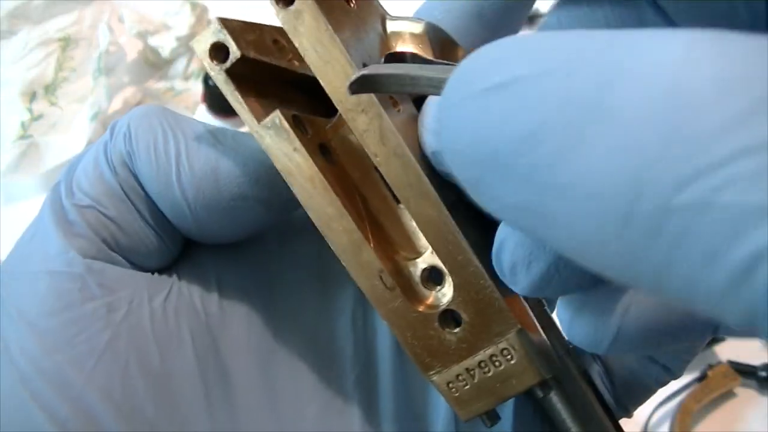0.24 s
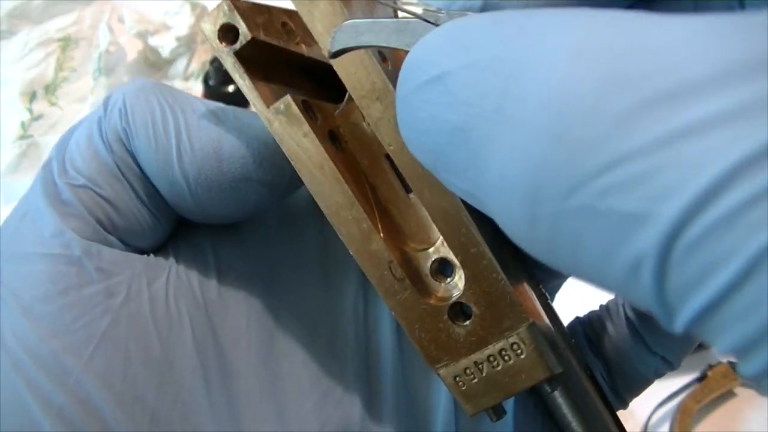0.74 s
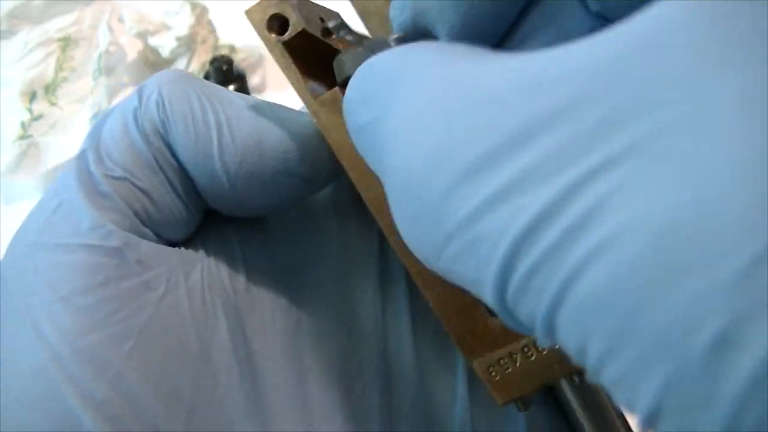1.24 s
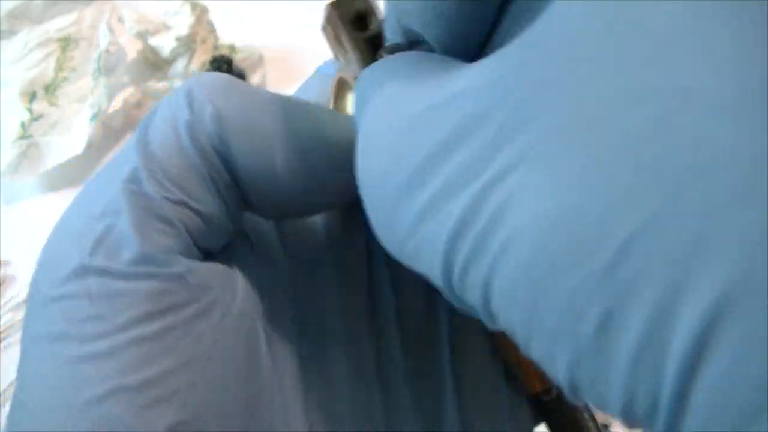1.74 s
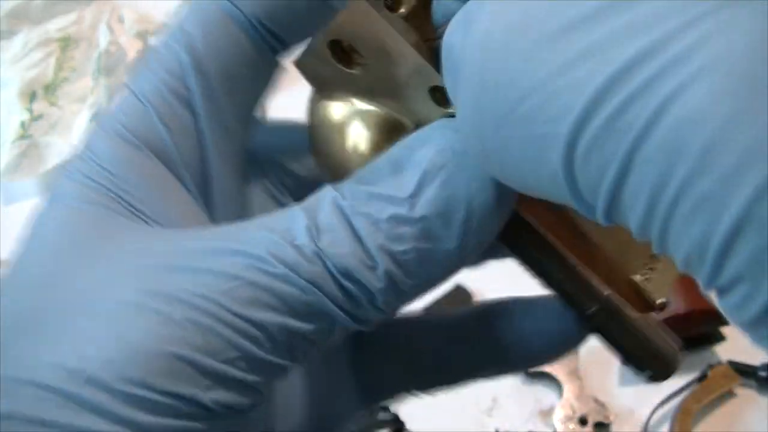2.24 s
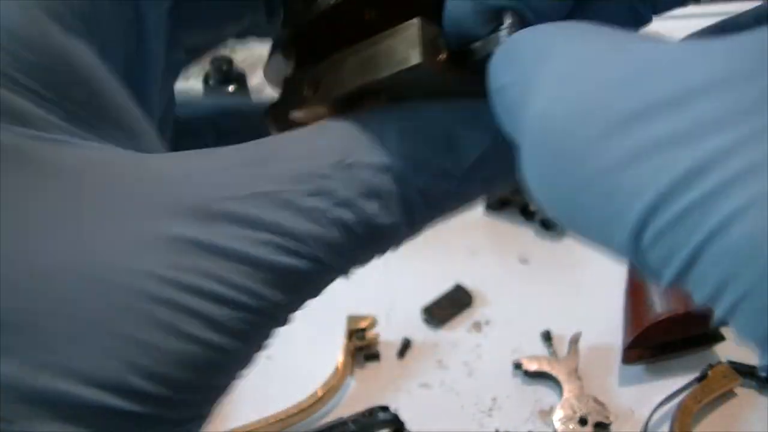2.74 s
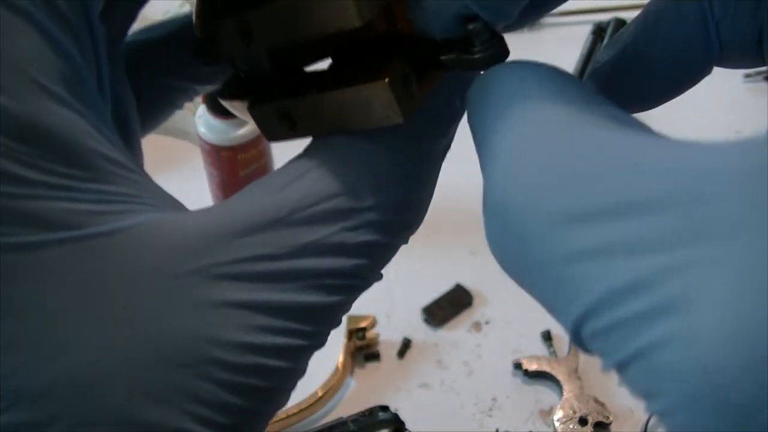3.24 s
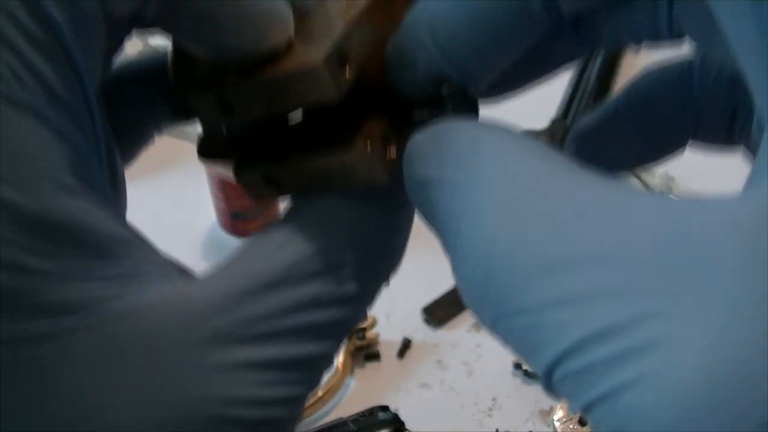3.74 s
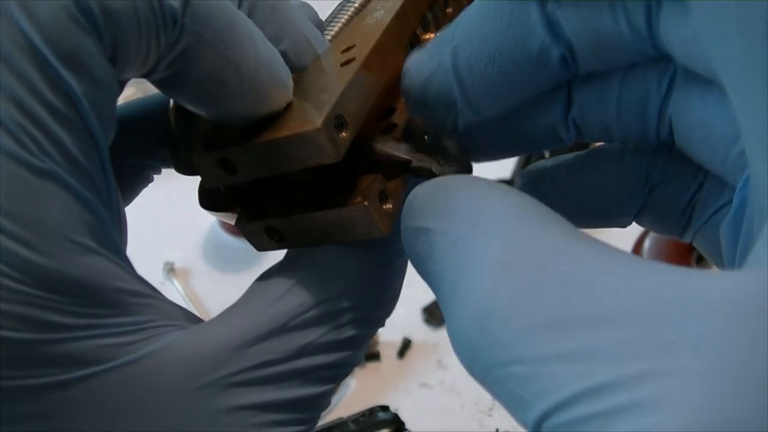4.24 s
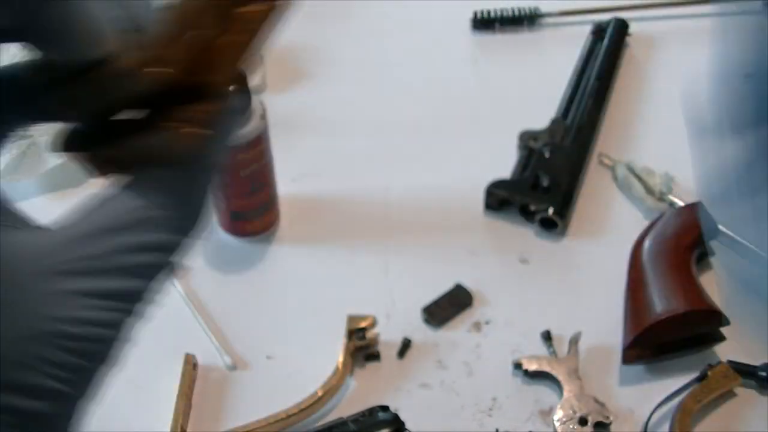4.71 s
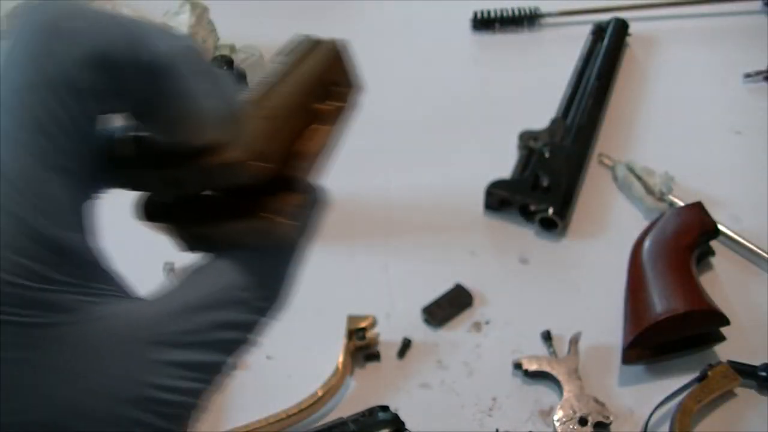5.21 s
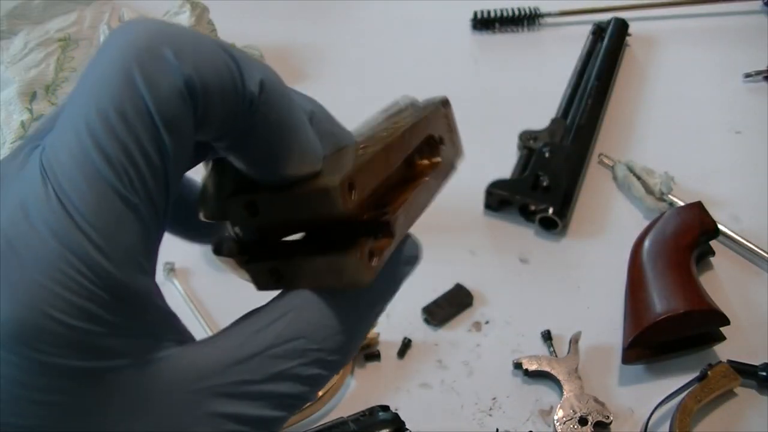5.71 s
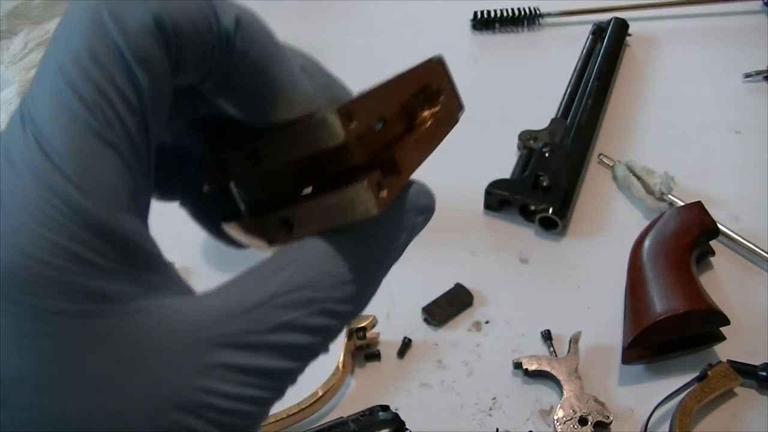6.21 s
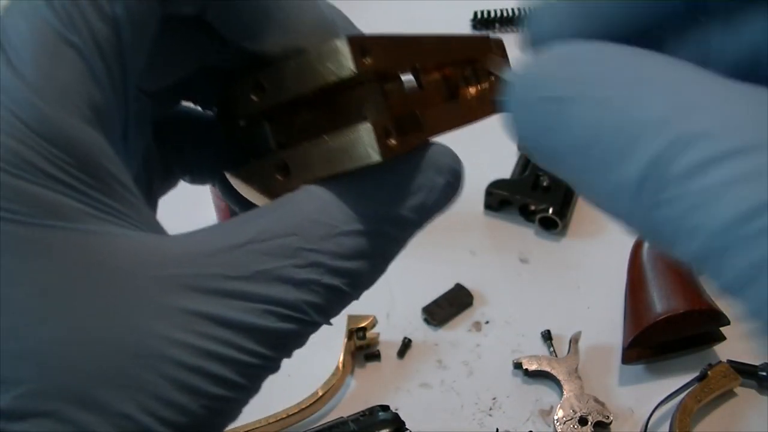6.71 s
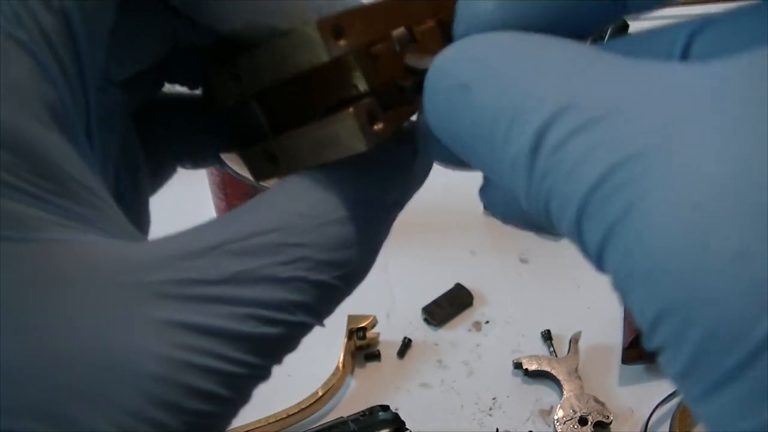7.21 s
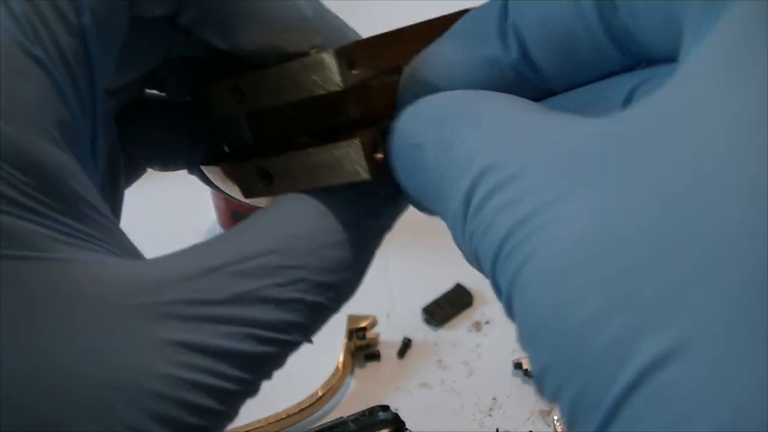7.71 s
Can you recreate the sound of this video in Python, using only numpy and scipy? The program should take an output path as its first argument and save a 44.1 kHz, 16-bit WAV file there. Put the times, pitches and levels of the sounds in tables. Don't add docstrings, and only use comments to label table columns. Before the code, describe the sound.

Very close in a small room with a low, wavering appliance hum, rubber gloves rub and squeak while small metal parts tick against a brass frame. A busy cluster of clicks peaks with one hard snap, then sparse ticks. Midway a part drops, cracks and bounces on the table, skids, and a wrist thumps softly. Glove rustle and light lever scrapes follow.

```python
import sys
import numpy as np
from scipy import signal
from scipy.fft import rfft, irfft
from scipy.io import wavfile
from scipy.ndimage import uniform_filter1d

SR = 44100
rng = np.random.default_rng(int(sys.argv[2]) if len(sys.argv) > 2 else 0)


def nominal_scale(level):
    x = np.asarray(level, float) / 20
    return 10 ** x


def generate_wav(signal):
    frames = np.transpose(np.atleast_2d(signal))
    scaled = np.clip(frames, -1, 1) * 32767
    pcm = np.round(scaled).astype(np.int16)
    wavfile.write(sys.argv[1], SR, pcm)


N = 351036
DECAY = np.log(1000)
ONSET_S = 0.0008


def level(x, db):
    return x * nominal_scale(db) / np.sqrt(np.mean(x ** 2))


def band(x, lo_hz, hi_hz):
    sos = signal.butter(2, [lo_hz, min(hi_hz, 0.45 * SR)], "band", fs=SR, output="sos")
    return signal.sosfilt(sos, x)


def walk(rate_hz):
    hold = int(SR / rate_hz)
    steps = np.repeat(rng.standard_normal(N // hold + 1), hold)
    return 1.729 * uniform_filter1d(uniform_filter1d(steps, hold), hold)[:N]


def ring(hz, t60_s, length_s):
    t = np.arange(int(length_s * SR)) / SR
    return np.sin(2 * np.pi * hz * t) * np.exp(-DECAY * t / max(t60_s, 0.001))


def add(out, start_s, x):
    i = int((start_s + ONSET_S) * SR)
    out[i:i + len(x)] += x[:N - i]


def strokes(rows, lean):
    fade_db = 15
    t, power = np.arange(0, N + 64, 64) / SR, 0
    for peak_s, rise_s, fall_s, db, colour_db in rows:
        away = np.where(t < peak_s, (peak_s - t) / rise_s, (t - peak_s) / fall_s)
        power = power + nominal_scale(db + lean * colour_db - fade_db * away) ** 2
    return np.interp(np.arange(N) / SR, t, np.sqrt(power))


# pitch_hz [Hz], level_db [dB]
MOTOR_TONES = [(118.4, -67), (220.7, -61.5), (296.1, -62), (344.5, -56.5), (382.2, -62.5), (430.7, -62),
               (532.9, -75.5)]
# freq_hz [Hz], density_db [dB per Hz]
AIR_COLOUR = [(24, -57), (40, -10.5), (91, -14), (106, -10.5), (180, -9), (209, -0.5), (262, -5),
              (345, -4.5), (556, -14.5), (1270, -23.5), (1370, -23), (1760, -24), (4340, -31), (10400, -36),
              (16000, -42.5)]
# freq_hz [Hz], likeness [0-1]
PORT_LIKENESS = [(60, 0.12), (130, 0.3), (290, 0.77), (640, 0.03), (1410, 0), (3100, 0), (6820, 0),
                 (15000, 0)]


def hum():
    t = np.arange(N) / SR
    tones = 0
    for pitch_hz, db in MOTOR_TONES:
        swell = nominal_scale(db + 3.0 + 1.687 * walk(9))
        tones = tones + swell * np.sin(2 * np.pi * pitch_hz * t + 0.783 * walk(4))
    log_hz = np.log(np.maximum(np.fft.rfftfreq(N, 1 / SR), 1))
    air_hz, air_db = np.transpose(AIR_COLOUR)
    like_hz, likeness = np.transpose(PORT_LIKENESS)
    colour = nominal_scale(np.interp(log_hz, np.log(air_hz), air_db))
    like = np.clip(np.interp(log_hz, np.log(like_hz), likeness), 0, 1) ** 0.5
    mid = irfft(rfft(rng.standard_normal(N)) * colour, N)
    side = irfft(rfft(rng.standard_normal(N)) * colour * np.sqrt((1 - like) / (1 + like)), N)
    air = level(np.array([mid + side, mid - side]), -50) * nominal_scale(0.5 * walk(2.862))
    return (air + tones) * nominal_scale(np.array([[0.4], [-0.4]]))


# peak_s [s], rise_s [s], fall_s [s], level_db [dB],
# brightness_db [dB]
GLOVE_RUBS = [(.085, 0.16, 0.052, -61, -1.5), (.16, 0.039, 0.065, -67.5, 7),
              (.474, .03, 0.107, -77.5, -9), (1.427, 0.047, 0.18, -63, -3.5),
              (1.731, 0.08, 0.079, -55.5, 1), (1.891, 0.157, 0.264, -48.5, 0.5),
              (2.085, 0.158, 0.078, -46.5, -0.5), (2.187, 0.0137, 0.035, -43, 2),
              (2.217, 0.0136, 0.0426, -40, 7.5), (2.258, 0.048, 0.0256, -45, -2),
              (2.41, 0.158, 0.205, -47.5, 1.2), (2.502, 0.016, 0.0295, -59, 11),
              (2.574, 0.101, 0.276, -52, 0), (2.898, 0.055, 0.408, -55, 1),
              (3.417, 0.032, 0.105, -60.5, -3.5), (3.602, 0.047, 0.053, -60.5, 0),
              (4.171, .035, 0.052, -69.5, 10), (4.28, 0.032, 0.0225, -66, 16.5),
              (4.825, 0.0186, 0.0805, -40, -2.5), (4.884, 0.039, 0.096, -50, -8.5),
               (4.925, 0.079, 0.0153, -53, 4), (5.05, 0.118, 0.234, -68.5, -17.5),
               (5.444, 0.0176, 0.046, -43.5, -3), (5.5, 0.061, 0.0142, -40.5, 4),
               (5.55, 0.176, 0.283, -51, 1), (5.795, 0.0236, 0.08, -44, 3.5),
               (5.832, 0.062, 0.0625, -42.5, 2.5), (5.948, 0.0068, 0.057, -44.5, 6.5),
               (5.983, 0.033, 0.087, -46, -2), (6.133, 0.0236, 0.0363, -47, 2.5),
               (6.432, 0.089, 0.039, -56, -1.5), (6.5, 0.085, 0.047, -64.5, 6.5),
               (6.67, 0.196, 0.66, -70, 10), (7.129, 0.089, 0.258, -56.5, -2.5),
               (7.378, 0.075, 0.044, -57, 1), (7.555, 0.064, 0.1, -58.5, -4),
               (7.61, 0.014, 0.148, -54.5, 5), (7.912, 0.2, .04, -63.5, -4.5)]
# low_hz [Hz], high_hz [Hz], level_db [dB], brightness_share [ratio]
RUBBER_BANDS = [(545, 2060, -6, -0.987), (2538, 4780, -2.5, -0.49), (4306, 7660, -4, 0.64),
                (7680, 11200, -5.5, 0.526), (11100, 14330, -14.5, 1.13)]


def gloves():
    snap_gain, snaps_per_s, resting_db = 2, 600, -73
    snaps = rng.random(N) < snaps_per_s / SR
    slips = nominal_scale(1.18 * walk(150)) * (1 + snap_gain * snaps)
    out = 0
    for low_hz, high_hz, db, lean in RUBBER_BANDS:
        grains = rng.standard_normal(N) * nominal_scale(1.73 * rng.exponential(size=N))
        grains = grains * slips * nominal_scale(2.0 * walk(60))
        pressure = strokes(GLOVE_RUBS, lean) + nominal_scale(resting_db)
        out = out + pressure * level(band(grains, low_hz, high_hz), db)
    return out


# pitch_hz [Hz], level_db [dB], t60_s [s]
FRAME_MODES = [(2374, -2, 0.0256), (3540, -5, 0.0227), (5190, -5, 0.017)]
# start_s [s], level_db [dB peak]
FRAME_TOUCHES = [(0.312, -31), (0.479, -38), (1.163, -36.5), (2.7576, -37.5), (3.561, -41), (3.9325, -33),
                 (5.1006, -39), (6.4849, -33), (6.5111, -42.5), (7.0189, -36.5)]
# start_s [s], level_db [dB
# peak], pitch_hz [Hz]
DULL_CONTACTS = [(0.064, -42, 2080), (0.0802, -36, 3500), (0.0987, -39, 3510), (0.127, -45.5, 2700),
                 (0.145, -30, 3350), (0.165, -31, 2940), (0.427, -45, 3000), (0.4689, -26, 2460),
                 (0.623, -40.5, 2700), (1.0735, -41.5, 1820), (1.3066, -43, 1400), (1.417, -38, 2400),
                 (1.4913, -40.5, 2580), (1.533, -43, 2000), (1.557, -39.5, 3060), (1.87, -38.5, 1890),
                 (1.971, -38, 2100), (2.117, -37.5, 2100), (2.137, -30.5, 2900), (2.185, -31.5, 6500),
                 (2.2002, -38.5, 2800), (2.2149, -30.5, 6800), (2.228, -33, 5100), (2.238, -20.5, 6500),
                 (2.253, -31, 3170), (2.262, -32, 3900), (2.3483, -26.5, 3530), (2.3575, -27, 3300),
                 (2.369, -28.5, 3304), (2.378, -39, 2200), (2.441, -34.5, 2390), (2.615, -38.5, 2610),
                 (2.648, -43.5, 3000), (2.6808, -44, 3500), (2.884, -42.5, 2000), (2.9056, -39.5, 2200),
                 (2.93, -41, 2300), (2.968, -39, 4300), (3.053, -32.5, 2470), (3.185, -41.5, 3000),
                 (3.2237, -39, 2500), (3.3598, -39.5, 2300), (3.3895, -38.5, 3100), (3.494, -39, 2900),
                 (3.63, -46.5, 2770), (4.405, -39, 2200), (4.8046, -8, 2215), (5.3576, -35.5, 3090),
                 (5.679, -42.5, 3000), (5.876, -39.5, 2800), (6.443, -37.5, 1970), (6.8409, -47.5, 2500),
                 (7.194, -42, 2200), (7.2275, -45, 2994), (7.468, -43, 2300), (7.566, -38.5, 3300),
                 (7.5907, -34.5, 3400), (7.7708, -43.5, 2400)]
# start_s [s], level_db [dB peak], pitch_hz [Hz], edge_db [dB]
SHARP_CONTACTS = [(1.0736, -30.5, 4660, -13.5), (1.4137, -41.5, 3900, -9.5), (1.428, -33.5, 4100, 1.5),
                  (1.689, -35.5, 5500, -1.5), (1.8373, -38, 1700, 1), (1.864, -31.5, 11000, 0.5),
                  (1.979, -32.5, 9800, -8), (2.015, -38.5, 3550, -6), (2.033, -34, 9600, -1.5),
                  (2.109, -33, 10600, -9), (2.2352, -6, 6290, -5.5), (2.236, -17.5, 7870, -21),
                  (2.3105, -39.5, 3080, -1.5), (2.327, -29.5, 4400, 3.5), (2.4798, -38, 2300, 1),
                  (2.5657, -27, 3170, -3.5), (2.569, -28, 5200, -3), (2.8774, -46.5, 9000, 0),
                  (2.9053, -40.5, 8100, -8), (3.0184, -36, 2110, -2), (3.043, -40, 10500, -7.5),
                  (3.073, -42.5, 2000, 3), (3.1015, -44, 2050, 10), (3.126, -41, 3200, -1),
                  (3.225, -36.5, 7160, -6.5), (4.284, -45.5, 4330, 14.5), (4.4715, -21.5, 8600, 0.5),
                  (4.485, -19.5, 6800, 0), (4.6564, -27, 9500, -1), (4.779, -25, 6000, -5),
                  (4.8044, -17, 3540, -21.5), (4.8046, -20, 11650, -5), (4.8113, -12, 8160, -17.5),
                  (4.8374, -23.5, 5500, -9.5), (4.86, -23, 8800, -6), (4.8875, -31.5, 5200, -7),
                  (4.8943, -34.5, 8700, -14), (4.914, -39, 8460, -6), (5.384, -40.5, 5057, -3),
                  (5.4387, -28.5, 1497, -1), (5.439, -23.5, 3700, -7), (5.546, -39, 4000, 4),
                  (5.5861, -42.5, 4500, -1.5), (5.722, -40, 9000, -6), (5.798, -39, 9500, -6.5),
                  (5.976, -21.5, 4070, -0.1), (6.0036, -34, 4400, 1.5), (6.1257, -29, 5670, 1),
                  (6.9931, -47, 7440, -2), (7.119, -44, 5500, -1)]
# start_s [s], level_db [dB peak], pitch_hz [Hz], thud_db [dB]
HEAVY_CONTACTS = [(0.145, -28.5, 1760, -5.5), (1.9835, -37.5, 1520, 1), (2.19, -28, 6480, -4.5),
                  (2.2245, -36.5, 1740, -4.5), (2.235, -30, 1806, -11.5), (2.4404, -21.5, 5300, -2.5),
                  (2.466, -40, 1300, -3.5), (4.725, -30, 1336, 5.5), (4.8523, -31, 2200, -5),
                  (4.8604, -28, 1900, -2), (4.8775, -31.5, 1360, -4.5), (4.8874, -33, 1950, -6.5),
                  (4.9005, -35.5, 1800, 4), (5.829, -40, 1000, -2), (5.98, -34, 1070, -6.5),
                  (5.99, -41.5, 950, -3)]


def ticks():
    light_thud_db, dull_edge_db, heavy_edge_db = -45, -39.5, -31
    rows = [(s, db, 0, light_thud_db, dull_edge_db) for s, db in FRAME_TOUCHES]
    rows += [(s, db, hz, light_thud_db, dull_edge_db) for s, db, hz in DULL_CONTACTS]
    rows += [(s, db, hz, light_thud_db, edge_db) for s, db, hz, edge_db in SHARP_CONTACTS]
    rows += [(s, db, hz, thud_db, heavy_edge_db) for s, db, hz, thud_db in HEAVY_CONTACTS]
    out, t = np.zeros(N), np.arange(1764) / SR
    impact = t == 0
    thud = ring(967, 0.00297, 0.04)
    for start_s, db, pitch_hz, thud_db, edge_db in rows:
        noise = rng.standard_normal(len(t))
        rattle = 0.421 * noise * np.exp(-DECAY * t / 0.0183)
        spray = band(rattle + 4.12 * impact, 1160, 7360)
        if pitch_hz:
            body = 1.069 * ring(pitch_hz, 13 / pitch_hz, 0.04) + 0.433 * spray
        else:
            frame = 0
            for (hz, mode_db, t60_s), spot in zip(FRAME_MODES, noise):
                frame = frame + nominal_scale(mode_db + 3.75 * spot) * ring(hz * (1 + 0.0126 * spot), t60_s, 0.04)
            body = 0.563 * frame * np.minimum(t / 0.0019, 1) + 0.84 * spray
        edge = band(1.35 * noise * np.exp(-DECAY * t / 0.003) + impact, 7550, 10800)
        edge = edge * min(nominal_scale(0.69 * (db + edge_db + 55)), 1)
        add(out, start_s, nominal_scale(db) * (body + nominal_scale(thud_db + 5) * thud + nominal_scale(edge_db + 6.0) * edge))
    return band(out, 388, 13400)


# pitch_hz [Hz], level_db [dB], ring_share [share of the ring time]
LEVER_MODES = [(4356, 0.18, 1.01), (4420, -14, 4.9), (4670, -10, 0.314), (5123, -19.5, 0.45),
               (3105.5, 5, 1.03), (3510, 2, 1.64), (6572, 0.5, 0.503), (9800, 7, 0.37), (7160, -0.5, 0.43),
               (10600, 2, 0.36)]
LEVER_MODE_GROUPS = [0, 3, 0, 0, 1, 2, 3, 3, 4, 4]
# start_s [s], level_db [dB peak], lowest_db [dB], upper_db [dB]
LOOSE_LEVER_TAPS = [(1.3831, -70, -9, 9.5), (1.429, -39.5, -15, 4), (1.452, -57.5, -25, -0.5),
                    (1.49, -63, -25, -6), (1.53, -64.5, -25.5, -6.5), (1.6403, -64, -5, 6),
                    (1.679, -50, -20.5, -13), (2.072, -52, -21.5, -19.5), (2.0994, -43, -21.5, -19),
                    (2.465, -50, -18.5, -24), (3.405, -50, -10.5, -10), (4.173, -31, -21.5, -33),
                    (4.2235, -53.5, -14.5, -14.5), (4.264, -40, -18, -7.5), (5.952, -44, -19, -25),
                    (7.196, -46, -16.5, -17.5), (7.212, -54.5, -21, -32), (7.607, -39.5, -21.5, -16.5),
                    (7.614, -40, -8, -8.5), (7.6797, -54.5, -18.5, -18), (7.7167, -56, -18.5, -21.5),
                    (7.757, -57, -22.5, -26.5), (7.819, -52, -19, -15), (7.876, -54.5, -16.5, -17.5),
                    (7.9124, -38, -13, -25.5), (7.945, -58, -7, -22)]
# start_s [s], level_db [dB peak], lowest_db [dB], upper_db [dB]
SEATED_LEVER_TAPS = [(1.3825, -65, 10.5, -14.5), (2.0597, -44.5, -15.5, -11), (2.386, -46.5, -11, -17),
                     (2.4, -43, -10, -8), (2.4217, -37.5, -21.5, -16), (2.889, -43, -17, -4.5),
                     (4.148, -40, -25, -25), (4.1704, -37, -14.5, -28.5), (4.2475, -52, -22.5, -14.5),
                     (7.302, -50.5, -10.5, -7), (7.327, -46, -40.5, -21), (7.374, -39, -15.5, -10.5),
                     (7.4175, -49, -15, -11), (7.438, -50.5, -9, -14.5), (7.652, -56, -17.5, -13.5)]
# peak_s [s], rise_s [s], fall_s [s], main_db [dB], high_db [dB]
LEVER_SLIDES = [
    (1.742, 0.095, 0.0253, -45.5, -9),
    (2.068, 0.028, 0.044, -57.5, -19.5),
    (2.405, 0.031, 0.039, -45, -13.5),
    (3.408, 0.0117, 0.0137, -52.5, -17.5),
    (4.176, 0.039, .02, -53, -6),
    (7.45, 0.044, 0.0264, -46, -16),
    (7.615, 0.0174, 0.034, -45.5, -18),
    (7.917, 0.026, 0.038, -48, -19),
]


def lever():
    ring_s = 0.0709
    other_low_db, other_up_db = -8.5, -14.5
    taps = [(s, db, [0, low, low + other_low_db, up, up + other_up_db])
            for s, db, low, up in LOOSE_LEVER_TAPS]
    taps += [(s, db, [0, low + other_low_db, low, up + other_up_db, up])
             for s, db, low, up in SEATED_LEVER_TAPS]
    out = np.zeros(N)
    for start_s, db, group_db in taps:
        tap = 0
        spots = rng.standard_normal(len(LEVER_MODES))
        for (hz, mode_db, share), group, spot in zip(LEVER_MODES, LEVER_MODE_GROUPS, spots):
            mode = ring(hz * (1 + 0.00105 * spot), ring_s * share, 0.3)
            tap = tap + nominal_scale(mode_db + 2.46 * spot + group_db[group]) * mode
        add(out, start_s, nominal_scale(db + 3.0) * tap * np.minimum(np.arange(len(tap)) / 30, 1))
    grit = rng.standard_normal(N) * nominal_scale(4.0 * walk(120))
    main = level(band(grit, 4080, 4820), -3.5) + level(band(grit, 3440, 3540), -14.5)
    high = level(band(grit, 9750, 9950), 0.51) + level(band(grit, 6520, 6680), -1.16)
    return out + strokes(LEVER_SLIDES, 0) * main + strokes(LEVER_SLIDES, 0.88) * high


# start_s [s], level_db [dB peak], board_db [dB], thud_db [dB], lower_db [dB]
TABLE_KNOCKS = [
    (4.4722, -11, -8, -6.5, -2),
    (4.4842, -19.5, -24.5, -13.5, -6),
    (4.6564, -14.5, -13.5, -8, -10),
    (4.6674, -13.5, -17, 0, -9),
    (4.778, -26, -12, -6.5, -25),
    (4.8043, -16.5, -33, -26.5, -9.5),
    (4.811, -27.5, -13, -15, -13),
    (4.815, -27.5, -29, -4, -15.5),
]
# pitch_hz [Hz], level_db [dB], t60_s [s]
PART_MODES = [(873, 4, 0.0123), (1420, 4.5, 0.0047), (1936, 8.5, 0.00892), (2310, -2.5, 0.0064),
              (3420, 2.5, 0.01043), (4826, -6.5, 0.0071), (6540, 4.5, 0.0144), (7904, 7.5, 0.013),
              (11000, 2.5, 0.0058), (13400, -3, 0.0043)]
PART_MODE_GROUPS = [1, 2, 2, 0, 0, 0, 3, 3, 3, 3]
# pitch_hz [Hz], level_db [dB], t60_s [s]
NEAR_BOARD_MODES = [(183, -25, 0.187), (230, -24, 0.04), (255.9, 0.5, 0.188), (334, -4.5, 0.084),
                    (411.8, -1.5, 0.108), (484, 0, 0.031), (657.6, 3, 0.091), (800.5, 1, 0.092),
                    (987, -15.5, 0.09)]
# pitch_hz [Hz], level_db [dB], t60_s [s]
FAR_BOARD_MODES = [(215, -7, 0.135), (272, 2, 0.083), (436.1, -2, 0.185), (550, -11, .08),
                   (716, 0.5, 0.076), (808, -10.5, .14), (881, -7.5, 0.118), (982, -7.5, 0.084)]


def knocks():
    bounced_s = 4.6
    detune = 0.015
    out, wall_blow = np.zeros(N), np.zeros(N)
    for start_s, db, board_db, thud_db, lower_db in TABLE_KNOCKS:
        group_db = [0, thud_db, lower_db, -6.5 + 1.4 * db]
        crack, blunt, boom, sign = 0, 0, 0, 1
        for (hz, mode_db, t60_s), group in zip(PART_MODES, PART_MODE_GROUPS):
            gain = nominal_scale(db + mode_db + group_db[group])
            struck_hz = hz * (1 + detune * rng.standard_normal())
            crack = crack + sign * gain * ring(struck_hz, t60_s * 0.95, 0.3)
            blunt = blunt + gain * ring(struck_hz, t60_s * 0.099, 0.3)
            sign = -sign
        for hz, mode_db, t60_s in NEAR_BOARD_MODES if start_s < bounced_s else FAR_BOARD_MODES:
            boom = boom + nominal_scale(db + board_db + mode_db + rng.standard_normal()) * ring(hz, t60_s, 0.3)
        crack = crack * np.minimum(np.arange(len(crack)) / 8, 1)
        add(out, start_s, nominal_scale(2.5) * crack + nominal_scale(-2.5) * boom)
        add(out, start_s + 0.000704, nominal_scale(-8.0) * crack)
        add(wall_blow, start_s, nominal_scale(4) * blunt + nominal_scale(-11.5) * boom)
    return signal.sosfilt(signal.butter(4, 175, "high", fs=SR, output="sos"), [out, wall_blow])


# peak_s [s], rise_s [s], fall_s [s], level_db [dB], unused_db [dB]
SKID_STROKE = [
    (4.89, 0.088, 0.058, -44.5, 0),
]
# pitch_hz [Hz], width_hz [Hz], level_db [dB]
SKID_BANDS = [(234, 28, 0.5), (453.8, 56, -0.5), (822, 38, 3.5), (903, 92, -2.5), (1183, 51, -4.5)]


def skid():
    grit = rng.standard_normal(N) * nominal_scale(4.05 * walk(110))
    scrape = sum(level(band(grit, hz - width_hz / 2, hz + width_hz / 2), db)
                 for hz, width_hz, db in SKID_BANDS)
    return strokes(SKID_STROKE, 0) * scrape


# start_s [s], level_db [dB peak], pitch_hz [Hz]
WRIST_BUMPS = [
    (4.965, -37, 160),
    (5.0, -45.5, 75),
    (5.072, -56, 160),
]


def bumps():
    t60_s, attack_s = 0.163, 0.011
    out = np.zeros(N)
    for start_s, db, pitch_hz in WRIST_BUMPS:
        thump = ring(pitch_hz, t60_s, 0.3)
        add(out, start_s, nominal_scale(db) * thump * np.minimum(np.arange(len(thump)) / (attack_s * SR), 1))
    return out


# centre_hz [Hz], level_db [dB], t60_s [s]
ROOM_BANDS = [(315, -18, 0.594), (863, -19.5, 0.514), (2030, -24, 0.535), (3634, -24.5, 0.426),
              (6560, -29.5, 0.503), (10740, -34.5, 0.303)]
# centre_hz [Hz], level_db [dB], t60_s
# [s]
LINGERING_BANDS = [(1039, -29.5, 0.232), (1716, -32.5, 0.35), (2167, -30, 0.38), (3056, -24, 0.547),
                   (3672, -24, 0.647), (4320, -29, .4), (4686, -24.5, 0.53), (6550, -30, 0.47)]


def room(x):
    wall_gap_s = 0.0015
    half_width = 0.0405
    t = np.arange(int(0.7 * SR)) / SR
    shared, own = rng.standard_normal(len(t)), rng.standard_normal((2, len(t)))
    tail = 0
    for hz, db, t60_s in ROOM_BANDS:
        echoes = shared + min(0.049 + hz / 5000, 1) * own
        tail = tail + nominal_scale(db) * np.exp(-DECAY * t / t60_s) * band(echoes, hz / 1.522, hz * 1.373)
    echoes = shared[::-1] + 0.366 * own[:, ::-1]
    for hz, db, t60_s in LINGERING_BANDS:
        narrow = band(echoes, hz * (1 - half_width), hz * (1 + half_width))
        tail = tail + nominal_scale(db) * np.exp(-DECAY * t / t60_s) * narrow
    tail = tail * np.clip((t - wall_gap_s) / 0.003, 0, 1) * nominal_scale(-13.0)
    return signal.fftconvolve(x[None], tail, axes=1)[:, :N]


def ports(x, lag_samples, case_share):
    delay = np.exp(-2j * np.pi * np.fft.rfftfreq(N))
    shading = 1 - case_share + case_share * delay ** 2
    left = irfft(rfft(x) * delay ** lag_samples * shading, N)
    return np.array([left * nominal_scale(1.0), x * nominal_scale(-0.4)])


def scene():
    background = hum()
    held = gloves() + ticks() + lever() + bumps()
    table, wall_blow = knocks()
    near = ports(held, lag_samples=0.707, case_share=0.2175)
    near = near + ports(table, lag_samples=0.4, case_share=0.161)
    return near + room(wall_blow + nominal_scale(-11) * held) + background + skid()


def roll_off(x):
    return signal.sosfilt(signal.butter(12, 16990, fs=SR, output="sos"), x)


def record(dry):
    cut = signal.sosfilt(signal.butter(2, 55, "high", fs=SR, output="sos"), dry)
    cut = signal.sosfilt(signal.ellip(8, 0.2, 60, 15950, fs=SR, output="sos"), cut)
    return roll_off(np.clip(cut, -1, 1))


dry = scene()
out = record(dry)
generate_wav(out)
```